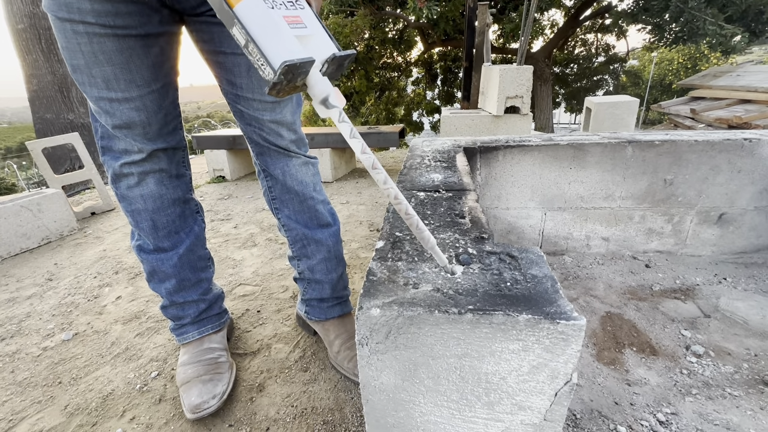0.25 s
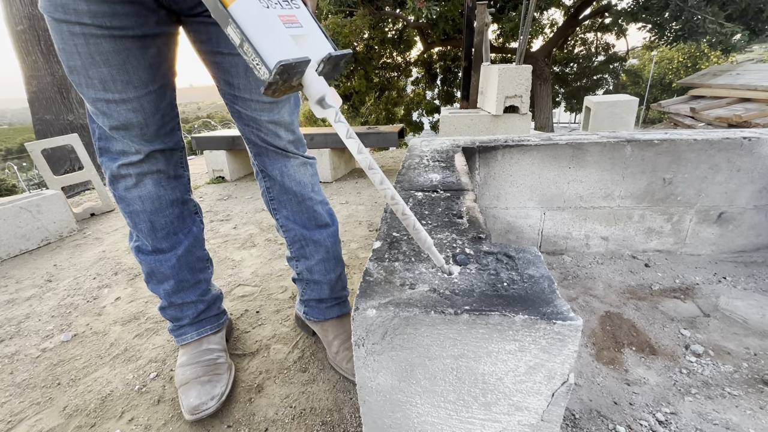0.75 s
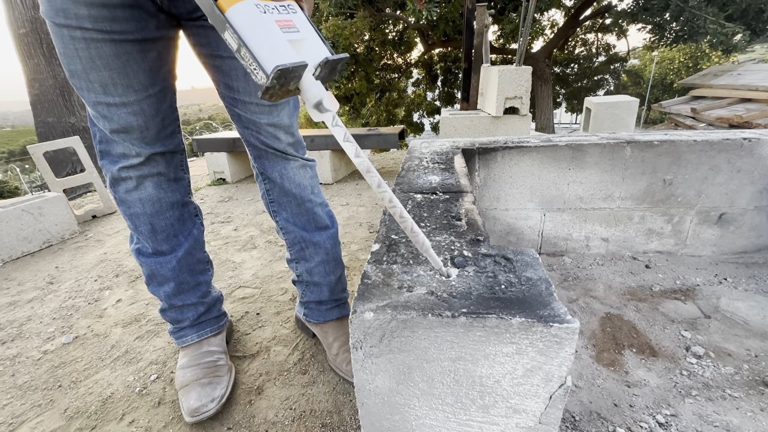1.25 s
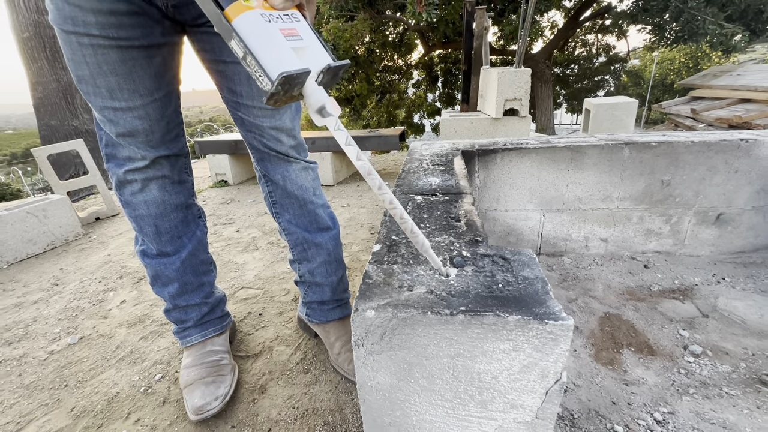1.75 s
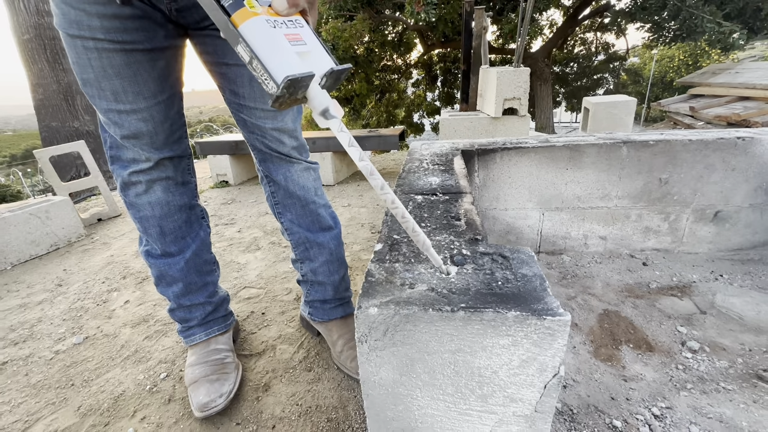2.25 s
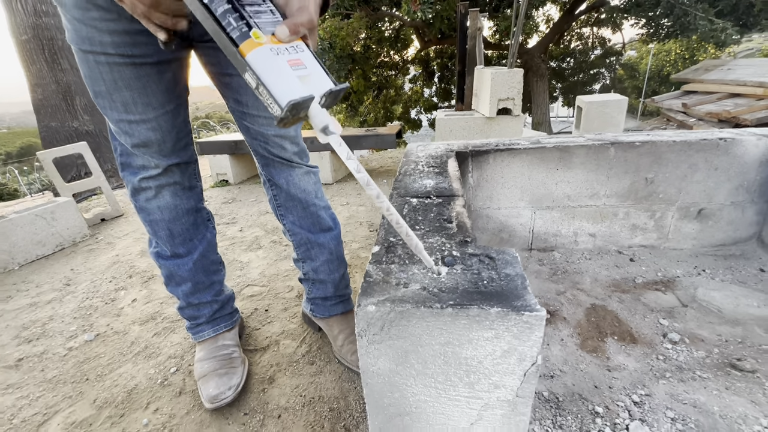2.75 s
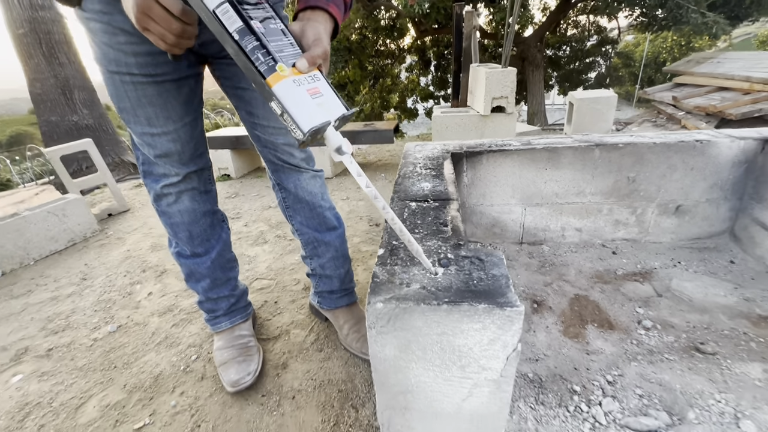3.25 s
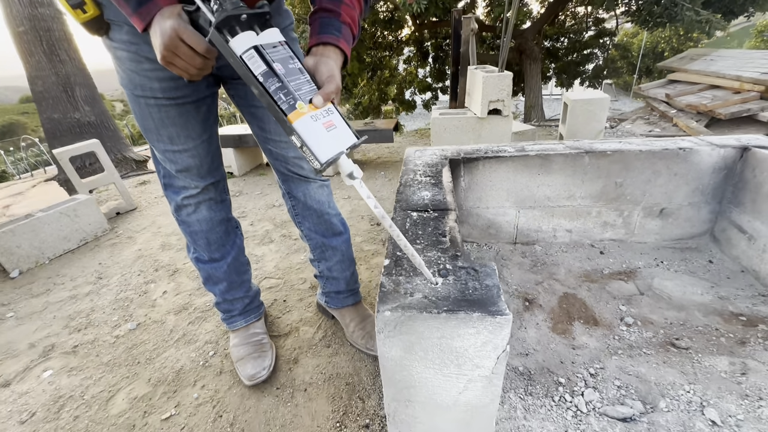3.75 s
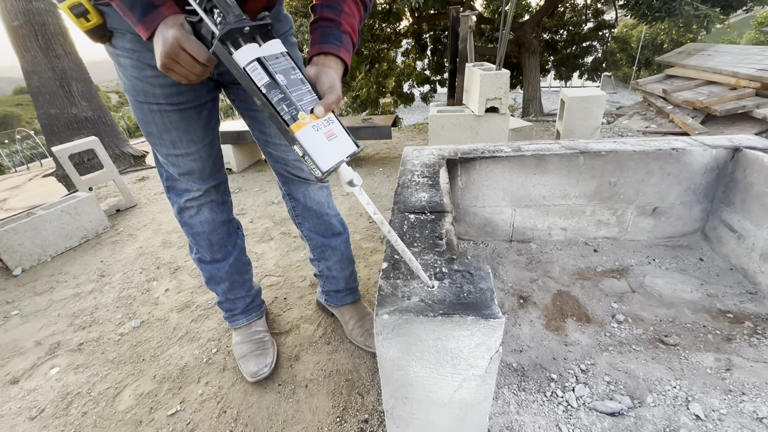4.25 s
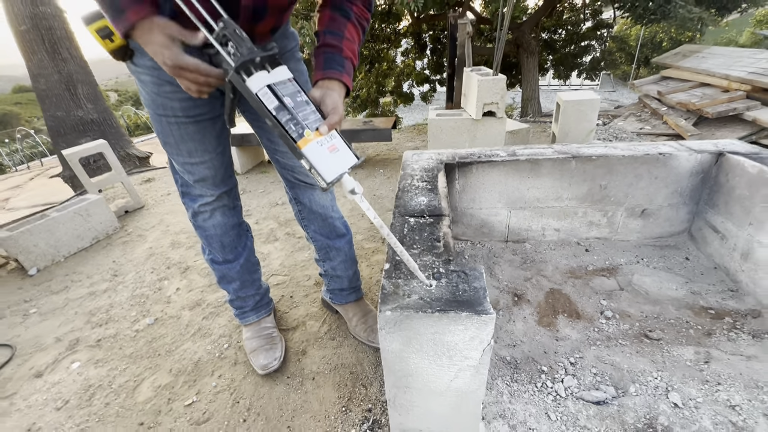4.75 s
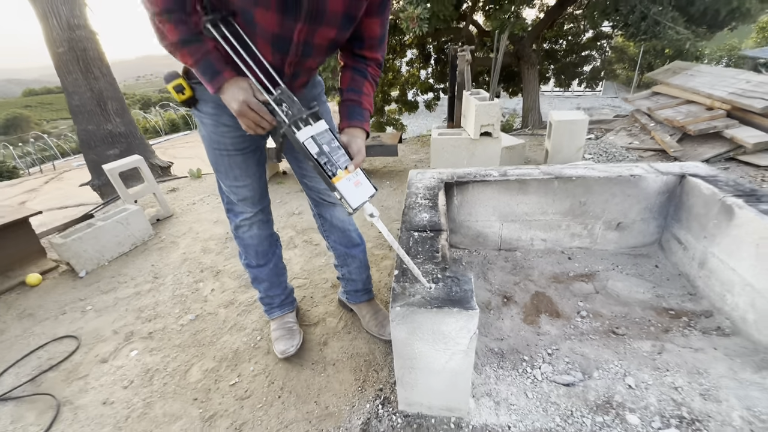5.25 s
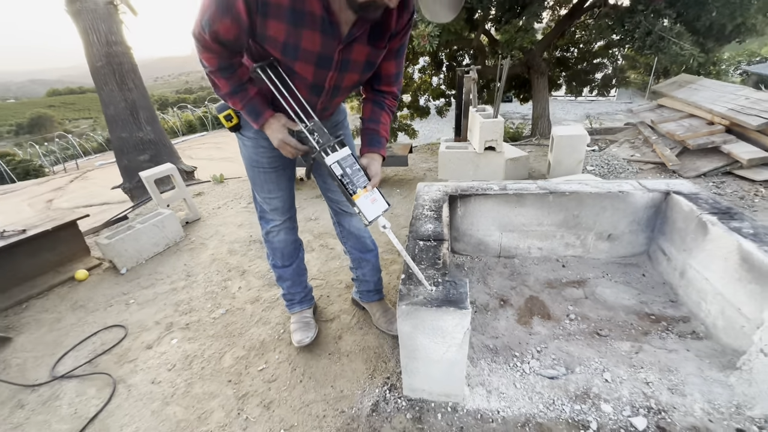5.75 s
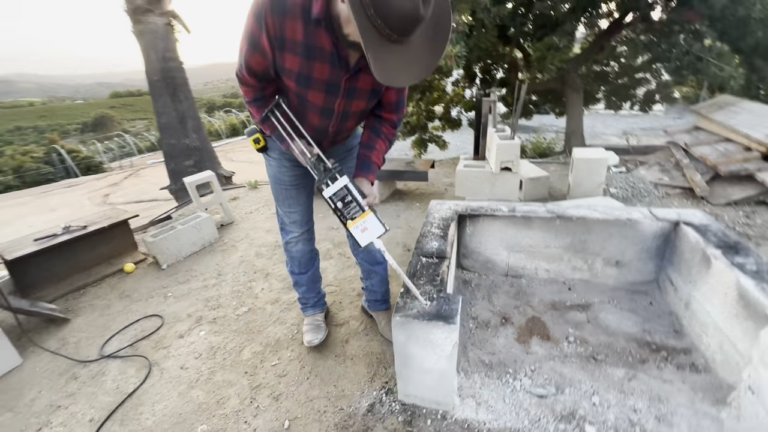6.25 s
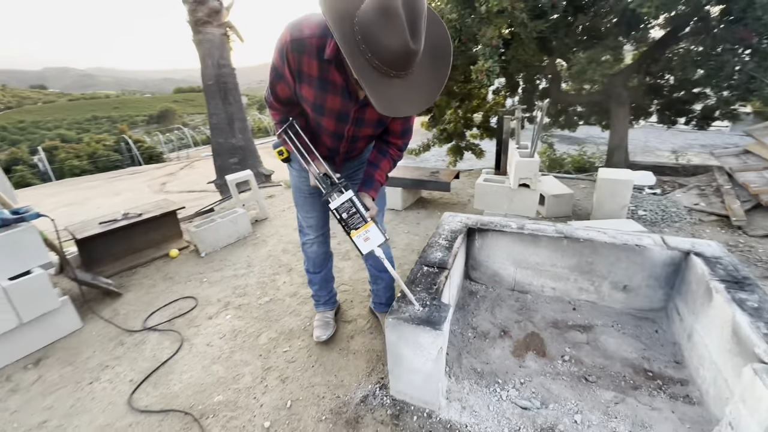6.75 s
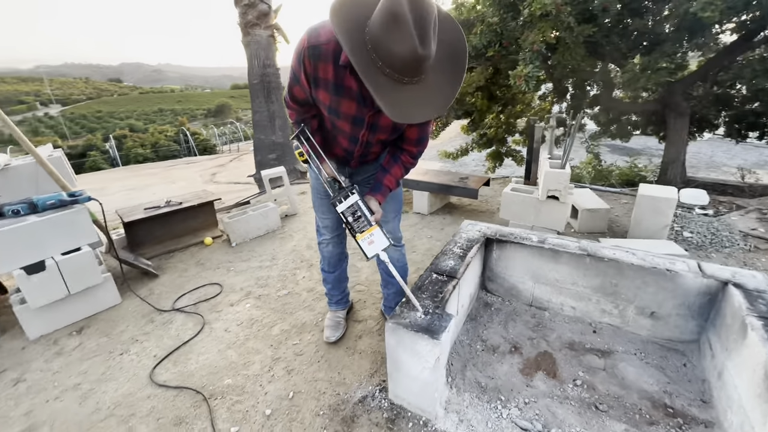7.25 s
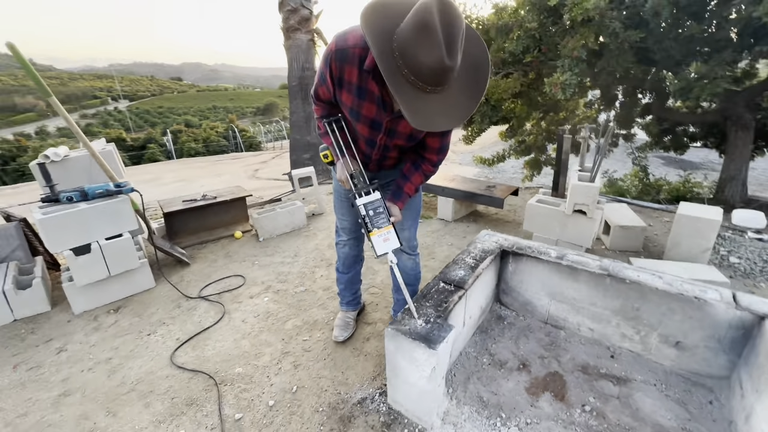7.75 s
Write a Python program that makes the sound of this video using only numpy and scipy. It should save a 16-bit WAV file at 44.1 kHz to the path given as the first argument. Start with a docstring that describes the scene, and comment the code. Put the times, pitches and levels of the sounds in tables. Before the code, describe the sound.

Close stereo hand-held microphones outdoors catch a hand-pumped dispensing gun. Crisp metal ticks with faint rod creaks come first, then a bright knock with a tiny squeak. Softer knocks, pings and a second squeak follow, with nozzle taps and scrapes on the block. A hard metallic clack towers over everything late, followed by small rattles. Faint rumble, airy hum and a whistling songbird sit behind.

```python
"""A hand-pumped dispensing gun in a yard: filtered bursts of noise make its ratchet ticks and frame knocks.
Dying sine waves make a pinging plate, low chirps, clear rings and nozzle taps; tiny random slips make creaks
and scrapes. Stacked partials and rasping noise make two rod squeaks. Around it: a far rumble and yard air of
banded noise, a hum of thin lines, a songbird of gliding whistles, and wind noise and swinging bumps on
hand-held microphones."""
import sys
import numpy as np
from scipy import signal
from scipy.io import wavfile
from scipy.ndimage import uniform_filter1d

SR = 44100
rng = np.random.default_rng(int(sys.argv[2]) if len(sys.argv) > 2 else 0)


def store_wav(level_fs):
    """Save 16-bit WAV to argv[1]."""
    pcm = np.round(np.clip(np.atleast_2d(level_fs), -1, 1) * 32767)
    wavfile.write(sys.argv[1], SR, pcm.T.astype(np.int16))


N = 353235

# Levels in the tables are set ahead of echoes and microphones.
# ways the gun rings: [f/Hz, level/dB, time to die by 60 dB/s]
GUN_MODES = [(696, 11, 0.044), (820, 2.5, 0.076), (1085, 20.5, 0.04), (1365, 9, 0.034), (1505, 16.5, 0.011),
             (1760, -2, 0.034), (1816, 13, 0.017), (1973, -0.5, 0.017), (2330, 7, 0.067), (3760, 2, 0.033),
             (4050, 6.5, 0.012), (4500, -4.5, 0.03), (5170, -3, 0.03), (6400, 8, 0.024), (6710, 4, 0.034),
             (8860, 0.5, 0.011), (9430, -2, 0.01), (14900, 4, 0.015)]
# handling of the gun, as the scuff of hands and nozzle: [t/s, level/dB]
SCUFF_LEVEL = [(0.0, -76), (0.45, -83), (1.0, -63.5), (1.3, -82), (1.72, -65), (2.2, -103), (2.43, -58),
               (2.81, -76.5), (3.23, -59), (3.95, -73.5), (4.39, -66), (4.57, -61.5), (5.25, -63.5),
               (5.47, -53), (5.78, -68), (6.27, -55.5), (6.5, -79), (7.12, -64), (7.4, -56.5), (8.01, -103)]
# broad resonances of the scuff: [f/Hz, width/Hz, level/dB]
SCUFF_MODES = [(556, 630, -6.5), (1055, 1017, 0), (1550, 326, 6), (2280, 433, -5.5), (3425, 2300, -19)]
# scrapes of the nozzle on the block: [t/s, length/s, level/dB]
SCRAPES = [(2.671, 0.21, -63.5), (4.55, 0.11, -61.5), (5.459, 0.053, -54.5), (5.487, 0.29, -67),
           (6.272, 0.045, -54.5), (7.064, 0.056, -54), (7.42, 0.16, -59), (7.878, 0.049, -47)]
# a scraping nozzle also rattles the frame: [f/Hz, width/Hz, level/dB]
RATTLE_MODES = [(1580, 200, 0)]
RATTLE_DB = 0.5  # against the scrape
# a faint treble hiss: [t/s, level/dB]
HISS_LEVEL = [(0, -76), (0.5, -85), (2.3, -89.5), (2.45, -70.5), (2.8, -82.5), (3.2, -70.5), (3.6, -78.5),
              (3.95, -68), (4.4, -76.5), (6.3, -71.5), (6.5, -75.5), (7.5, -73.5), (8.01, -74.5)]
# low sound and air: [t/s, deep far rumble/dB, wind on the ports/dB, yard air/dB]
BACKGROUND_LEVELS = [(0, -52.5, -68, -62), (1.2, -53, -72.5, -64), (4.4, -55, -62, -63),
                     (4.9, -56, -67, -60), (5.3, -69, -58.5, -64), (5.8, -64, -61.5, -61.5),
                     (6.4, -70.5, -70.5, -62.5), (7.3, -60, -69.5, -63), (8.01, -57.5, -67, -59)]
# colour of the far rumble: [f/Hz, level/dB per Hz]
RUMBLE_SPECTRUM = [(20, -13.5), (49, -2), (70, 6.5), (153, -4.5), (190, -13), (348, -16), (420, -27.5),
                   (500, -30)]
UPPER_RUMBLE_DB, UPPER_FOLLOWS = -54.5, 0.81  # mean level; share of the deep rumble's swing
# colour of the yard air: [f/Hz, level/dB per Hz]
AIR_SPECTRUM = [(120, -46), (200, 0), (640, 3.5), (756, 10), (876, -13), (1220, -1), (1320, 1), (2700, -20),
                (6320, -75.5), (9140, -33), (11400, -63), (13500, -34), (16500, -61)]
# how alike left and right are in rumble and air: [f/Hz, likeness 0-1]
LIKENESS = [(50, 0.89), (250, 0.92), (600, 0.19), (2500, 0.72), (9000, 0.073), (12000, 0.84)]
# lines of the hum: [f/Hz, middle level/dB]
HUM_LINES = [(761, -68), (1217, -70), (2980, -88)]
# bird notes: [t/s, length/s, first f/Hz, last f/Hz, level/dB]
BIRD_NOTES = [(0.037, 0.14, 4510, 3010, -67.5), (0.112, 0.028, 3030, 2400, -63.5),
              (0.188, 0.02, 2750, 2460, -63.5), (2.981, 0.058, 4220, 3900, -72),
              (3.694, 0.048, 3750, 3830, -68), (4.205, 0.015, 5120, 5110, -76),
              (4.227, 0.019, 5170, 3600, -71), (4.315, 0.085, 3200, 4130, -67),
              (4.652, 0.092, 2910, 3800, -63), (4.709, 0.035, 3814, 3910, -63),
              (4.855, 0.02, 4640, 4780, -64), (4.868, 0.051, 4720, 3460, -65.5),
              (4.971, 0.046, 4300, 3180, -62.5), (5.093, 0.07, 4510, 2680, -63.5),
              (5.285, 0.015, 5290, 5300, -62), (5.292, 0.026, 5350, 4250, -60),
              (5.368, 0.045, 3500, 2720, -64), (5.536, 0.018, 5260, 5100, -66.5),
              (5.542, 0.025, 5300, 4250, -61), (5.624, 0.05, 3600, 2230, -62),
              (5.79, 0.026, 6300, 6400, -68), (5.871, 0.09, 4020, 3360, -67),
              (5.95, 0.059, 2700, 2230, -65), (6.112, 0.15, 2740, 2300, -69),
              (6.395, 0.029, 6140, 6300, -66), (6.449, 0.038, 2810, 3170, -68),
              (6.488, 0.047, 3000, 2500, -69)]
# creaks of the rod under load: [t/s, length/s, level/dB, share of the lower resonance 0-1]
CREAKS = [(0.07, 0.21, -71.5, 0.7), (0.302, 0.031, -70.5, 0.7), (0.362, 0.12, -74.5, 0.8),
          (0.687, 0.036, -74.5, 0.8), (1.03, 0.022, -70, 0.57), (1.155, 0.12, -72.5, 0.46),
          (1.568, 0.053, -74, 0), (3.035, 0.18, -65, 0.42), (3.226, 0.033, -61, 0.2),
          (3.396, 0.077, -64, 0.18), (3.552, 0.049, -68, 0.23), (3.612, 0.085, -64.5, 0.2),
          (4.526, 0.12, -64, 0.28), (7.231, 0.078, -72, 0.1), (7.44, 0.47, -80, 0), (7.694, 0.083, -75, 1)]
# lower resonance of the creaking rod: [f/Hz, width/Hz, level/dB]
CREAK_LOW_MODES = [(5030, 430, 0)]
# upper resonance of the creaking rod: [f/Hz, width/Hz, level/dB]
CREAK_HIGH_MODES = [(6410, 490, 0)]
# knocks of lever and frame, before a tilt of 0.7 dB up on the left, 0.7 dB down on the right:
# [t/s, peak level/dB, frame f/Hz, brightness/dB]
KNOCKS = [(0.133, -45, 1450, -26), (1.925, -49, 1560, -50), (2.409, -28, 2450, -1.5),
          (3.377, -40, 1610, -45), (3.631, -43.5, 2020, -25), (3.836, -48.5, 1100, -29),
          (3.976, -36.5, 1600, 0.5), (4.097, -38, 1190, -15), (4.551, -42, 1330, -14),
          (4.594, -43.5, 2370, -19), (4.703, -36, 1510, -29), (5.079, -42.5, 1220, -35),
          (5.615, -47, 1680, -23), (6.091, -41, 1270, -5.5), (6.12, -44.5, 1800, -27),
          (6.283, -36.5, 1890, -15), (6.308, -49, 1560, -12), (6.33, -45, 1100, -25),
          (6.389, -42, 1310, -10.5), (6.443, -43, 1480, -10.5), (6.8182, -3, 1900, 8),
          (6.8215, -7, 1900, 3), (6.832, -20.5, 1450, -3), (6.851, -30, 1450, -29), (7.079, -32, 1540, 2.5),
          (7.372, -35, 1470, -46), (7.407, -37, 1630, -14), (7.426, -42.5, 1830, -14),
          (7.483, -30.5, 1800, -45), (7.528, -34.5, 1720, -52), (7.536, -39, 1660, -37),
          (7.544, -45, 1830, -14), (7.562, -39.5, 1450, -31), (7.874, -40.5, 805, -17),
          (7.915, -35.5, 1546, -17)]
# ratchet ticks, steel slipping on steel, before the same tilt: [t/s, peak level/dB]
TICKS = [(0.594, -47.5), (0.788, -28), (0.948, -34), (1.102, -28.5), (1.207, -29.5), (1.49, -54),
         (1.555, -28.5), (1.819, -31), (2.631, -52.5)]
TICK_FRAME_HZ, TICK_BRIGHT_DB = 2640, 10.5
STEEL_HZ, STEEL_DB_PER_OCTAVE = 6240, 30.5  # steel pitch at brightness 0; brighter contacts ring it higher
THUMP_HZ, THUMP_DB = 223, -27  # the whole gun jolts under each contact
# faint low chirps and clear rings of single parts: [t/s, f/Hz, level/dB, time to die by 60 dB/s]
RINGS = [(0.831, 1720, -55.5, 0.13), (0.872, 1390, -55.5, 0.11), (0.92, 1710, -56, .08),
         (1.4, 1690, -58, 0.17), (6.819, 7300, -9.5, .022), (6.85, 2150, -52, 0.27),
         (7.079, 5370, -38.5, 0.03), (7.079, 7106, -41, 0.033)]
# brushes of cloth: [t/s, length/s, level/dB]
BRUSHES = [(2.223, 0.075, -67), (6.017, 0.18, -76), (7.47, 0.1, -78), (7.862, 0.1, -71.5)]
# two squeaks of the rod in its grip: [t/s, slip rate f/Hz, first partial/dB, second partial/dB, rasp/dB]
SQUEAKS = [
    [(2.424, 2547, -47, -68, -48), (2.433, 2522, -25, -50, -44), (2.45, 2506, -30, -45, -45),
     (2.462, 2465, -23.5, -43, -41.5), (2.468, 2267, -34, -43, -30), (2.474, 2230, -43, -59, -39),
     (2.495, 2460, -59, -85, -71), (2.56, 2490, -59, -90, -102)],
    [(4.397, 2490, -41, -63, -58), (4.404, 2455, -35, -45.5, -49), (4.415, 2383, -45, -38.5, -45),
     (4.424, 2376, -28, -32.5, -54), (4.431, 2320, -33.5, -40.5, -30), (4.437, 2260, -23, -36, -31.5),
     (4.443, 2307, -32.5, -50, -37), (4.447, 2330, -25.5, -60, -48), (4.453, 2040, -56, -53, -49),
     (4.468, 2100, -51, -68, -53)],
]
# partials 3 to 6 of a squeak, against the second: [level/dB]
SQUEAK_UPPER_DB = [-10, -4.5, 0.5, -12]
# each partial leaves the rod in its own direction: [phase lead of the left port/rad]
SQUEAK_LEAD_RAD = [2.3, 1.4, -1.7, -1., 2.5, .1]
# below this range the first partial reaches both ports in step, above it with its full lead: [f/Hz]
IN_STEP_HZ = 2300, 2330
# moments of strong-weak slipping within the squeaks: [t/s, level/dB]
STUTTERS = [(2.457, -39), (4.43, -32.5)]
STUTTER_S = .004
# soft pings of a sprung plate in the gun: [t/s, level/dB, extra level of modes above 3 kHz/dB]
PINGS = [(3.83, -52, -11), (3.972, -35.5, -9.5), (4.097, -41, -17.5), (4.152, -46, -32), (4.701, -45, -4)]
# ways the plate rings: [f/Hz, level/dB, time to die by 60 dB/s]
PLATE_MODES = [(1580, 2.5, 0.067), (3710, -3, 0.082), (6500, -12.5, 0.15), (9560, -8, 0.14),
               (13280, -14, 0.1), (13370, 1.5, 0.12), (15860, -19, .1)]
RING_RISE_S = .005
# dry taps of the nozzle on the block: [t/s, level of the body/dB, f/Hz]
TAPS = [(4.115, -35.5, 2380), (4.613, -39.5, 2070), (5.21, -43.5, 1500), (5.252, -48.5, 2280),
        (5.331, -39.5, 1520), (5.475, -39.5, 760), (5.48, -34, 1150), (5.491, -35.5, 760),
        (6.301, -41, 1920), (6.328, -27, 1860), (6.842, -24, 1690), (6.849, -22, 1600), (7.32, -39.5, 2220),
        (7.487, -25, 1706), (7.528, -25.5, 1830)]
TAP_CYCLES, TAP_EDGE_DB = 10, -19.5  # cycles to die by 60 dB; level of the bright edge
# bumps on the microphone body: [t/s, level/dB]
BUMPS = [(4.918, -23), (4.934, -21.5), (4.951, -14), (5.009, -30.5), (5.036, -37), (5.066, -25.5),
         (5.091, -24), (5.124, -30), (5.14, -27), (5.158, -25.5), (5.408, -29)]
BUMP_HZ = 75.5
CUTOFF_HZ = 16700


def from_db(db):
    """Gain of a level in dB."""
    return 10 ** (np.asarray(db) / 20)


def rms_one(x):
    """Scales a sound to rms 1."""
    return x / np.sqrt(np.mean(x ** 2) + 1e-20)


def in_time(rows):
    """Draws each column after the time as a curve over all samples."""
    s, *columns = np.transpose(rows)
    return [np.interp(np.arange(N) / SR, s, c) for c in columns]


def at_hz(points, hz):
    """Reads a spectrum at one frequency, on a logarithmic pitch scale."""
    table = np.array(points)
    return np.interp(np.log(hz), np.log(table[:, 0]), table[:, 1])


def drift(rate_hz):
    """Random wandering of rms 1: noise smoothed by a two-pole low-pass, worked out on every 40th sample."""
    r = np.exp(-80 * np.pi * rate_hz / SR)
    noise = rng.standard_normal(N // 40 + 2002)
    slow = signal.lfilter([1], [1, -2 * r, r * r], noise)[2000:]
    return np.interp(np.arange(N) / 40, np.arange(len(slow)), rms_one(slow))


def band(x, low_hz, high_hz):
    """Keeps one range of pitch with a Butterworth filter."""
    edges = [low_hz, min(high_hz, .45 * SR)]
    return signal.sosfilt(signal.butter(2, edges, "band", fs=SR, output="sos"), x)


def resonance(x, hz, width_hz):
    """Rings one resonance, with gain near 1 on top."""
    r = np.exp(-np.pi * width_hz / SR)
    top = np.array([1, 0, -1]) * (1 - r * r) / 2
    return signal.lfilter(top, [1, -2 * r * np.cos(2 * np.pi * hz / SR), r * r], x)


def add(out, sound, s):
    """Mixes a sound in at a time in seconds."""
    i = max(round(s * SR), 0)
    out[..., i:i + sound.shape[-1]] += sound[..., :N - i]


def strokes(rows):
    """Gain over time of short strokes with soft ends."""
    out = np.zeros(N)
    for s, length, gain in rows:
        add(out, gain * signal.windows.tukey(int(length * SR), .4), s)
    return out


def grains(per_s, clumps_db, spread_db, modes):
    """Clumped tiny slips ring broad resonances; rms 1."""
    chance = per_s * from_db(clumps_db * drift(25)) / SR
    born = rng.random(N) < chance
    size_db = spread_db * np.minimum(rng.exponential(1, N), 4)
    slips = born * rng.choice([-1, 1], N) * from_db(size_db)
    ringing = 0
    for k, (hz, width, db) in enumerate(modes):
        ringing = ringing + (-1) ** k * from_db(db) * resonance(slips, hz, width)
    return rms_one(ringing)


def late_on_right(x):
    """The same sound reaches the right port 9 samples later."""
    return np.array([x, np.roll(x, 9)])


def opposed_ports(x):
    """A push reaches the ports in opposite sense, the left one 7 dB stronger."""
    return band(x, 35, 670) * [[1], [-1]] * from_db([[0], [-7]])


def banded_noise(spectrum, patchy_db):
    """Half-octave bands of stereo noise, each with its own level, flicker and likeness; rms 1."""
    lowest, highest = spectrum[0][0], spectrum[-1][0]
    edges = lowest * 2 ** np.arange(0, np.log2(highest / lowest), .5)
    white = rng.standard_normal((2, 2, N))
    out = 0
    for k, (low, high) in enumerate(zip(edges, edges[1:])):
        mid, side = band(white[k % 2], low, high)
        hz = np.sqrt(low * high)
        alike = np.clip(at_hz(LIKENESS, hz), -1, 1)
        gain = from_db(at_hz(spectrum, hz) + patchy_db * drift(28))
        out = out + gain * (np.sqrt(1 + alike) * mid + np.sqrt(1 - alike) * side * [[1], [-1]])
    return rms_one(out)


def echoes(x, wet_db, t60, dull_hz):
    """Scattered returns from ground, walls and trees: a dying noise tail, another one on each side."""
    t = np.arange(int(.5 * SR)) / SR
    tail = rng.standard_normal((2, len(t))) * from_db(-60 * t / t60) * (t > .004)
    tail = band(tail, 560, dull_hz)
    tail = tail / np.sqrt(np.sum(tail ** 2, axis=1, keepdims=True))
    return x + from_db(wet_db) * signal.fftconvolve(x, tail, axes=1)[:, :N]


def scuffs_and_scrapes():
    """Hands and nozzle rub in many tiny slips; nozzle scrapes also rattle the frame."""
    (scuff_db,) = in_time(SCUFF_LEVEL)
    scrape = strokes([(s, length, from_db(db)) for s, length, db in SCRAPES])
    rub = (from_db(scuff_db) + scrape) * grains(1500, clumps_db=3.5, spread_db=3.5, modes=SCUFF_MODES)
    rattle = scrape * grains(300, clumps_db=4.0, spread_db=3.0, modes=RATTLE_MODES)
    return late_on_right(rub + from_db(RATTLE_DB) * rattle)


def hiss():
    """Cloth hisses as treble noise whose level wanders both fast and slowly."""
    (level_db,) = in_time(HISS_LEVEL)
    noise = rms_one(band(rng.standard_normal((2, N)), 1900, 7830))
    return from_db(level_db + 2.2 * drift(50.6) + 2.6 * drift(1.2)) * noise


def far_rumble(deep_db):
    """Low noise in a deep and an upper part; the upper part follows most of the deep part's swing."""
    upper_db = UPPER_RUMBLE_DB + UPPER_FOLLOWS * (deep_db - deep_db.mean())
    noise = banded_noise(RUMBLE_SPECTRUM, patchy_db=1.0)
    deep = from_db(deep_db) * band(noise, 36, 115.0)
    return deep + from_db(upper_db) * band(noise, 86.4, 360)


def yard_air(air_db):
    """The air of the yard is wide, flickering noise."""
    return from_db(air_db) * banded_noise(AIR_SPECTRUM, patchy_db=3.0)


def hum():
    """A far machine hums on a few thin lines that waver a little, each side in its own way."""
    t = np.arange(N) / SR
    out = np.zeros((2, N))
    for hz, db in HUM_LINES:
        for side in out:
            level = np.sqrt(2) * from_db(db + 2.0 * drift(29))
            side += level * np.sin(2 * np.pi * hz * t + 1.07 * drift(12.6))
    return out


def wind(wind_db):
    """Wind pushes the two ports with gusty low noise."""
    noise = rms_one(band(rng.standard_normal(N), 45, 160))
    return opposed_ports(from_db(wind_db + 4.1 * drift(19.0)) * noise)


def bird():
    """Short whistled glides; a wall answers, the trees smear them."""
    out = np.zeros(N)
    for s, length, first_hz, last_hz, level_db in BIRD_NOTES:
        u = np.arange(int(length * SR)) / (length * SR)
        phase = 2 * np.pi * np.cumsum(first_hz * (last_hz / first_hz) ** u) / SR
        add(out, from_db(level_db) * signal.windows.tukey(len(u), .5) * np.sin(phase), s)
    out = out * from_db(2.5 * drift(150))  # moving air breaks the whistle up
    out = out + from_db(-5) * np.roll(out, round(0.025 * SR))  # the wall, 25 ms later
    return echoes(np.array([out, np.roll(out, 3)]), wet_db=-6, t60=.22, dull_hz=9000)


def creaks():
    """The loaded rod slips in clumps that ring a lower and an upper resonance."""
    low = strokes([(s, length, from_db(db) * np.clip(share, 0, 1)) for s, length, db, share in CREAKS])
    high = strokes([(s, length, from_db(db) * np.clip(1 - share, 0, 1)) for s, length, db, share in CREAKS])
    low_slips = band(grains(400, clumps_db=4.0, spread_db=4.0, modes=CREAK_LOW_MODES), 4400, 5800)
    high_slips = band(grains(300, clumps_db=4.0, spread_db=3.0, modes=CREAK_HIGH_MODES), 5500, 7600)
    return late_on_right(band(low * low_slips + high * high_slips, 3200, 12000))


def contacts():
    """Each tick or knock is a few ms of chatter that rings the frame and the steel parts near their pitches."""
    out, t = np.zeros((2, N)), np.arange(4000) / SR
    rows = [(s, db, TICK_FRAME_HZ, TICK_BRIGHT_DB) for s, db in TICKS] + list(KNOCKS)
    chatter = rng.standard_normal((len(rows), 2, len(t)))
    # each port hears the modes in its own mix
    strength_db = 2 * rng.standard_normal((len(rows), len(GUN_MODES), 2))
    for (s, peak_db, frame_hz, bright_db), grit, luck in zip(rows, chatter, strength_db):
        steel_hz = STEEL_HZ * 2 ** (bright_db / STEEL_DB_PER_OCTAVE)
        # 0 to 1: steel slipping on steel chatters longer and reaches higher
        hard = 1 / (1 + from_db(-bright_db - 3.5))
        length = .0025 + 0.0038 * hard
        u = t / length
        blow = u ** 2 * np.exp(-3.0 * u)
        settling = 0.088 * u / (1 + u) * from_db(-60 * t / 0.033)  # loose parts
        stereo_grit = grit[0] + 1.76 * grit[1] * [[1], [-1]]
        push = stereo_grit * np.abs(grit[0]) * (blow + settling)
        frame = .35 * band(band(push, 350, 2600), 350, 2600)
        steel = 2.2 * band(push, 1600, 23000)
        for (hz, level_db, t60), side_db in zip(GUN_MODES, luck):
            ring = resonance(push[0], hz, np.log(1000) / np.pi / t60)
            ring = ring * from_db(level_db + 10.0 + side_db)[:, None]
            if hz < 2700:
                frame += ring * from_db(-20.5 * abs(np.log2(hz / frame_hz)))
            else:
                steel += ring * from_db(-9.0 - 5.8 * abs(np.log2(hz / steel_hz)))
        for _ in range(2):
            steel = band(steel, 1200, 5000 + 20000 * hard)
        # a soft contact puts little treble into the frame
        frame = band(band(frame, 160, 3400 + 9000 * hard), 170, 3600 + 12000 * hard)
        hit = frame / np.abs(frame).max() + from_db(bright_db + 5.0) * steel / np.abs(steel).max()
        jolt = band(resonance(np.abs(push[0]), THUMP_HZ, 99.0), 60, 540)
        hit = hit + from_db(THUMP_DB) * jolt / np.abs(jolt).max()
        add(out, hit / np.abs(hit).max() * from_db(peak_db), s - length / 4)
    return out * from_db([[.7], [-.7]])


def rings():
    """Each chirp or ring is one sine that swells within a few ms and dies away with a wavering level."""
    out, t = np.zeros(N), np.arange(8000) / SR
    for s, hz, peak_db, t60 in RINGS:
        dying = from_db(peak_db - 60 * t / t60) * np.sin(2 * np.pi * hz * t)
        add(out, dying * np.minimum(t / RING_RISE_S, 1), s)
    return out * from_db(3.0 * drift(200))


def brushes():
    """Cloth brushes past in short strokes of bright noise."""
    level = strokes([(s, length, from_db(db)) for s, length, db in BRUSHES])
    return level * rms_one(band(rng.standard_normal(N), 5400, 15000))


def squeaks():
    """Regular stick-slip gives a stack of partials; uneven slips give a rasp that rings the gun."""
    hz, first_db, second_db, rasp_db = in_time(SQUEAKS[0] + SQUEAKS[1])
    on = np.zeros(N)
    for table in SQUEAKS:
        on[round(table[0][0] * SR):round(table[-1][0] * SR)] = 1
    on = uniform_filter1d(on, size=200)
    phase = 2 * np.pi * np.cumsum(hz * (1 + 0.00566 * drift(148))) / SR
    levels_db = [first_db, second_db] + [second_db + db for db in SQUEAK_UPPER_DB]
    leads = [np.interp(hz, IN_STEP_HZ, [0, SQUEAK_LEAD_RAD[0]])] + SQUEAK_LEAD_RAD[1:]
    left = np.array([[1], [0]])
    tone = 0
    for k, (db, lead) in enumerate(zip(levels_db, leads)):
        gain = np.sqrt(2) * from_db(db + (1.0 + 0.75 * k) * drift(180))
        tone = tone + gain * np.sin((k + 1) * phase + lead * left)
    t = np.arange(N) / SR
    stutter = sum(from_db(db) * np.exp(-((t - s) / STUTTER_S) ** 2) for s, db in STUTTERS)
    # strong-weak slips put lines between the partials
    tone = tone + stutter * (np.sin(3 * phase / 2 - left) + 0.37 * np.sin(7 * phase / 2))
    slips = rng.standard_normal((2, N)) * from_db(3.5 * drift(290))
    rasp = 0.76 * band(slips, 900, 18000)
    for f, db, _ in GUN_MODES:
        if f > 3000:
            rasp = rasp + from_db(db) * resonance(slips, f, 500)
    return on * (tone + from_db(rasp_db) * rms_one(rasp))


def pings():
    """The plate is set ringing within a few ms and dies away; each mode rattles in its own way."""
    out, t = np.zeros((2, N)), np.arange(8000) / SR
    rise = np.sin(np.pi / 2 * np.minimum(t / RING_RISE_S, 1)) ** 2
    chances = rng.standard_normal((len(PLATE_MODES), len(PINGS), 2, 1))
    for (hz, db, t60), luck in zip(PLATE_MODES, chances):
        mode = np.zeros((2, N))
        for (s, peak_db, upper_db), k in zip(PINGS, luck):
            # chance shifts level and phase on each side
            level_db = peak_db + db + upper_db * (hz > 3000) + 2 * k
            ring = from_db(level_db - 60 * t / t60) * np.sin(2 * np.pi * hz * t + k * hz / 5000)
            add(mode, ring * rise, s)
        out += mode * from_db(5.0 * drift(300))
    return out


def taps():
    """One click of the nozzle rings a few cycles, with a thin bright edge."""
    out, t = np.zeros((2, N)), np.arange(1200) / SR
    for (s, peak_db, hz), grit in zip(TAPS, rng.standard_normal((len(TAPS), 2, len(t)))):
        cycles = np.sin(2 * np.pi * hz * t) * from_db(-60 * t * hz / TAP_CYCLES)
        body = band(band(cycles, 440, 3200), 440, 3200)
        edge = band(grit * from_db(-60 * t / 0.006), 3500, 7500)
        click = body / np.abs(body).max() + from_db(TAP_EDGE_DB) * edge / np.abs(edge).max()
        add(out, from_db(peak_db) * click, s)
    return out


def bumps():
    """Each bump on the microphone body is a fast push and a slower swing back."""
    out, t = np.zeros(N), np.arange(3000) / SR
    for s, push_db in BUMPS:
        phase = 2 * np.pi * np.cumsum(BUMP_HZ * (1 + 1.1 * np.exp(-t / 0.0022))) / SR
        add(out, from_db(push_db) * np.sin(phase) * from_db(-60 * t / 0.066), s)
    return opposed_ports(out)


def scene():
    """Gun close by with short echoes, yard around it."""
    deep_db, wind_db, air_db = in_time(BACKGROUND_LEVELS)
    rubbing = scuffs_and_scrapes() + hiss() + creaks() + brushes()
    gun = echoes(rubbing + contacts() + rings() + pings() + taps(), wet_db=-13.5, t60=0.14, dull_hz=5670)
    gun = gun + echoes(squeaks(), wet_db=-22.0, t60=0.12, dull_hz=6000)
    yard = far_rumble(deep_db) + yard_air(air_db) + hum() + bird()
    return gun + yard + wind(wind_db) + bumps()


def record(dry):
    """Left and right are each tinted by a treble peak; the sound is thin near 11 kHz; both ends are cut."""
    left = dry[0] + 1.14 * resonance(dry[0], 5630, 2000)
    right = dry[1] + 0.12 * resonance(dry[1], 7300, 1300)
    low_cut = signal.butter(2, 30, "high", fs=SR, output="sos")
    both = signal.sosfilt(low_cut, np.array([left, right]))
    thinning = signal.butter(4, [10500, 12000], "bandstop", fs=SR, output="sos")
    both = 0.14 * both + 0.9 * signal.sosfilt(thinning, both)
    return signal.sosfilt(signal.cheby2(12, 70, CUTOFF_HZ, fs=SR, output="sos"), both)


dry = scene()
out = record(dry)
store_wav(out)
```